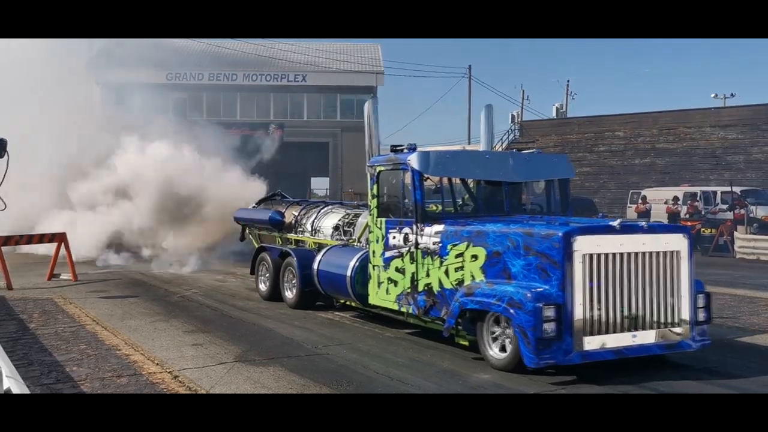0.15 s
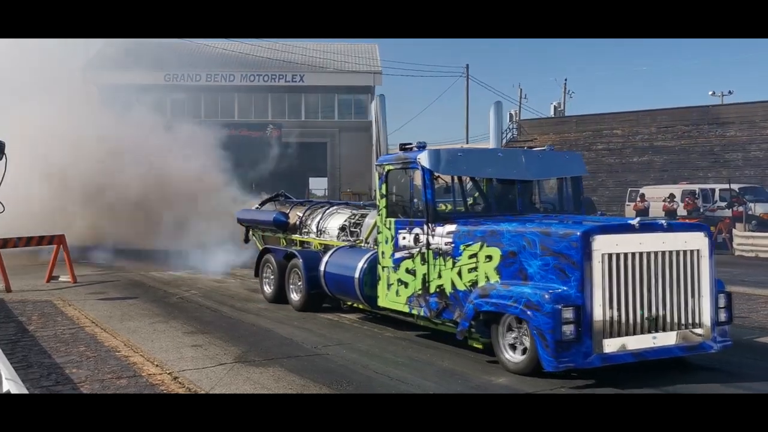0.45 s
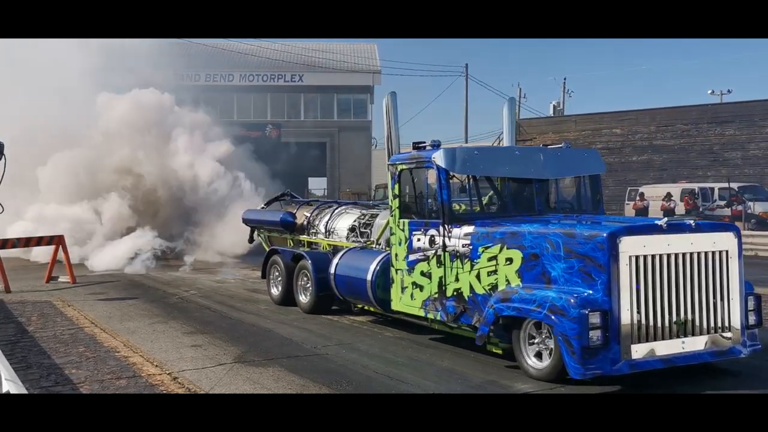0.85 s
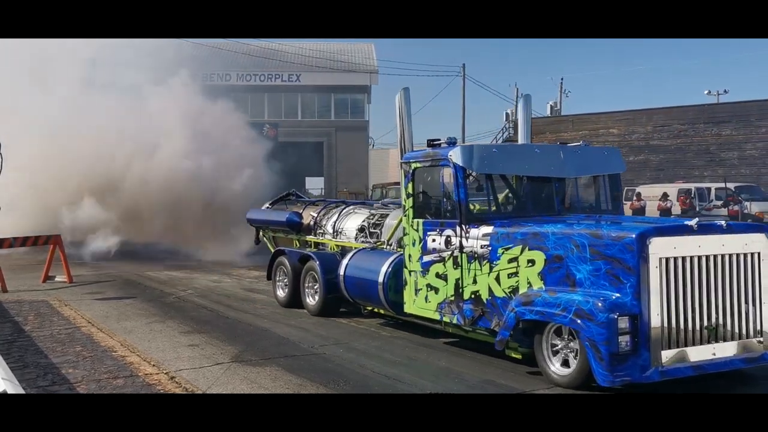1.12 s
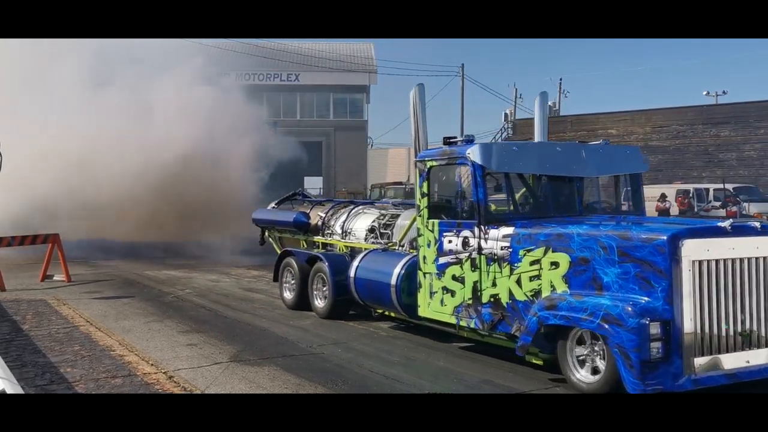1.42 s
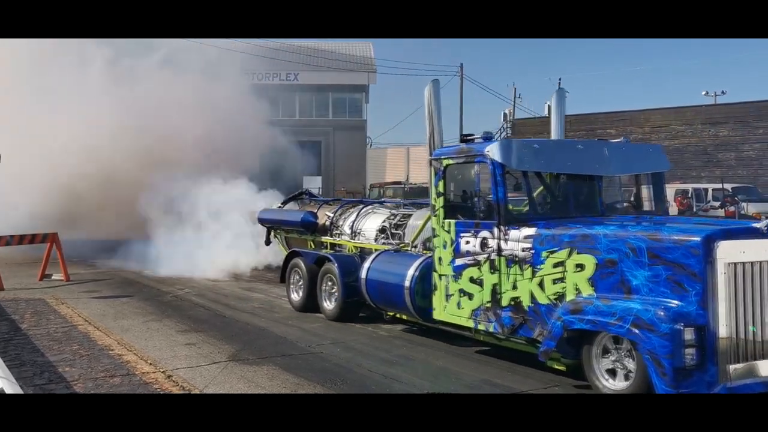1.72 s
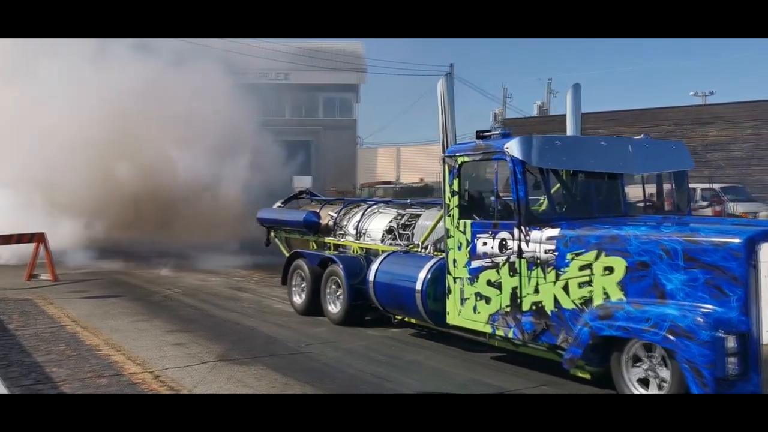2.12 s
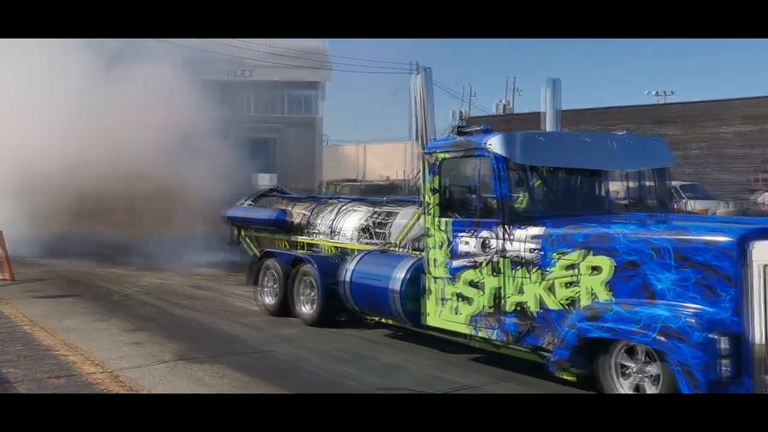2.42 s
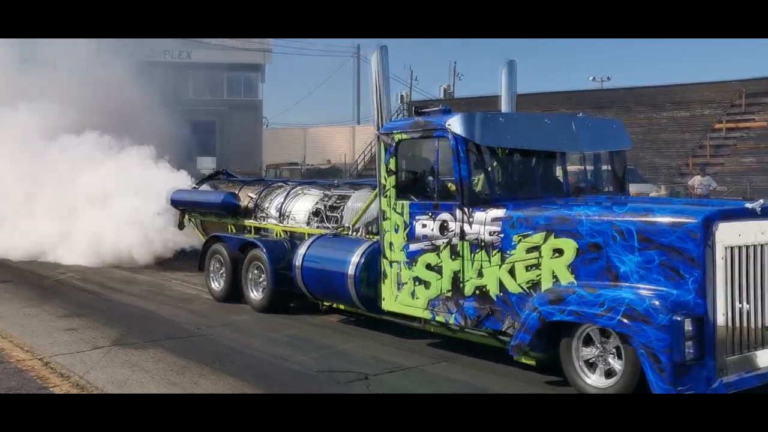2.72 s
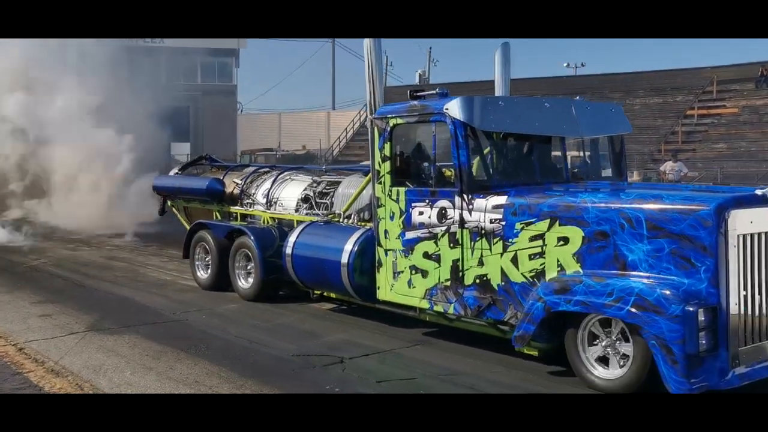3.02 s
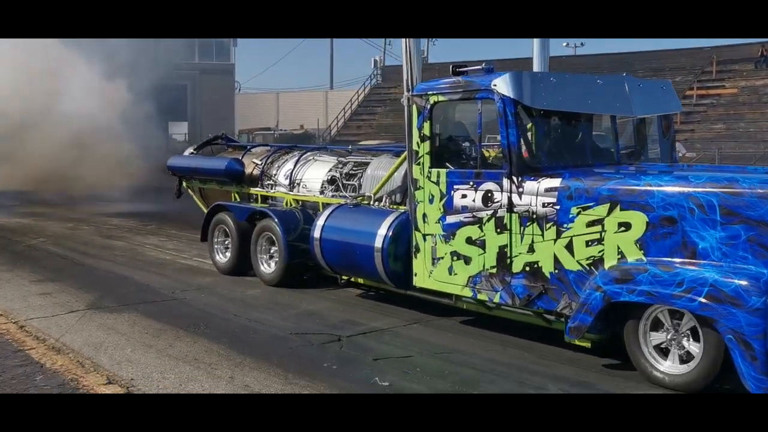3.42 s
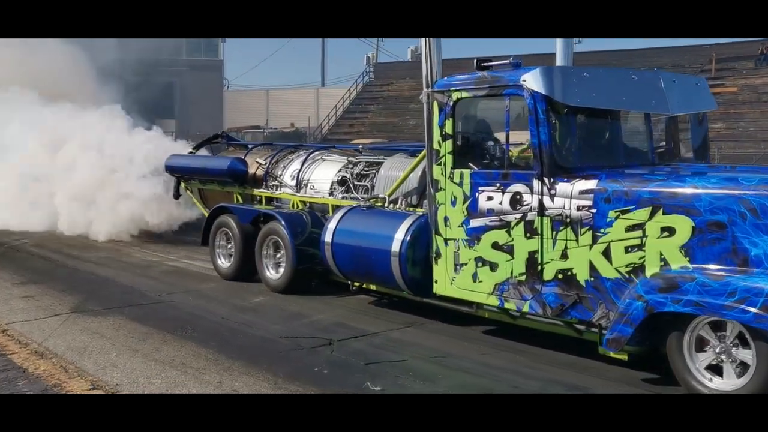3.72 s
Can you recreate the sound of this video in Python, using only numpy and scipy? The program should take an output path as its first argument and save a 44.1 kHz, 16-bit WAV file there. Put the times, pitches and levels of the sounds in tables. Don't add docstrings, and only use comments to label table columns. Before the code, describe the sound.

A jet engine on a truck idles close by with hiss and high wavering whine; four afterburner bangs burst into short rumbling roars, each echoed off a far wall, outdoors, overloading the stereo microphone.

```python
import sys
import numpy as np
from scipy import signal
from scipy.io import wavfile
from scipy.ndimage import uniform_filter1d

SR = 44100
rng = np.random.default_rng(int(sys.argv[2]) if len(sys.argv) > 2 else 0)


def log_audio(samples):
    frames = np.atleast_2d(samples).T
    limited = np.clip(frames, -1, 1)
    pcm = np.round(limited * 32767).astype(np.int16)
    wavfile.write(sys.argv[1], SR, pcm)


def natural_amplitude(level_db):
    exponent = np.asarray(level_db, float) / 20
    return 10 ** exponent


N = 170226

LIGHT_TIMES = [.1005, .831, 1.9435, 2.965]
ECHO_TIMES = [.349, 1.0845, 2.2015, 3.2285]
# (burn length [s], burn level [dB], flare level [dB])
BURNS = [(0.3598, -9, -13), (0.38, -7, -10.5), (0.339, -8.5, -14), (0.419, -9.5, -10.5)]
# (slam level [dB], echo level [dB])
SLAM_LEVELS = [(14, 16), (14, 13), (13, 16), (13, 16)]
# (frequency [Hz], density [dB per Hz])
RUMBLE_SPECTRUM = [(15, -43), (25, -14.5), (108, -3.5), (204, -0.5), (278, -7), (356, -18), (420, -20.5),
                   (550, -44), (920, -120)]
# (frequency [Hz], density [dB per Hz])
FLARE_SPECTRUM = [(250, -1), (400, 6), (650, 5.5), (950, -3.5), (1500, -3.5), (2500, -6), (4500, -13.5),
                  (8000, -20)]
# (frequency [Hz], density [dB per Hz])
ROLL_SPECTRUM = [(30, -4), (60, -7), (110, 0), (170, -4), (260, -15)]
# (time [s], first, second, third harmonic level [dB])
WHINE_LEVELS = [(0, -21.5, -26.5, -34), (.2, -15, -24.5, -41), (.55, -19, -29.5, -29), (.8, -17, -32, -38),
                (1.04, -28, -26, -33.5), (1.14, -14.5, -38.5, -56), (1.33, -20, -25.5, -24.5),
                (1.45, -26, -25.5, -29.5), (1.6, -16.5, -30.5, -38), (2.04, -21, -22, -38),
                (2.139, -8, -28, -48), (2.22, -20, -33, -33), (2.44, -11.5, -23, -34),
                (2.9, -22.5, -19, -37), (3.14, -21.5, -30.5, -45), (3.42, -24.5, -20, -25.5),
                (3.65, -13.5, -26, -32.5), (3.86, -13.5, -26, -44)]
WHINE_PAN_DB = [-10.5, -2, -19.5]
WHINE_LEAD = [0.9, 0.61, 1.84]
# (frequency [Hz], density [dB per Hz])
EXHAUST_SPECTRUM = [(15, -48), (25, -13.5), (157, -7), (642, -13.5), (1500, -11), (2040, -17), (2220, -4.5),
                    (2510, -12), (3500, -24), (4550, -50), (7700, -120)]
# (frequency [Hz], density [dB per Hz])
INTAKE_SPECTRUM = [(1470, -4), (2500, -5.5), (3290, -7.5), (4580, -2.5), (5760, -6.5), (6860, -12.5),
                   (9610, -12), (10900, -8.5), (15600, -20.5)]
# (frequency [Hz], width [Hz], level [dB])
HAYSTACKS = [(652, 195, -30), (1756, 180, -32.5), (2245, 500, -28.5), (2850, 150, -34), (4570, 1260, -30.5),
             (5600, 600, -38), (6750, 1400, -28)]
# (time [s], level [dB])
INTAKE_NEARNESS = [(0, 1), (.7, 0.5), (1.399, 1), (2.102, 1.5), (2.8, 2), (3.3, 3.5), (3.6, 4.5),
                   (3.86, 5.5)]
# (frequency [Hz], density [dB per Hz])
SWIRL_SPECTRUM = [(4000, -20), (4450, -4), (4750, 0), (5100, -10), (6000, -9), (6600, -7), (7200, -25)]
# (frequency [Hz], correlation [-1 to 1])
PORT_LIKENESS = [(60, 0.92), (150, 1), (300, 0.73), (640, 0.9), (1400, 0.22), (3100, 0.12), (6800, 0.013),
                 (15000, .01)]
# (frequency [Hz], left minus right [dB])
PORT_LEAN = [(60, -6), (110, 4.5), (200, -1), (380, -1), (700, -8.5), (1290, -5), (2380, -10), (4400, -2.5),
             (8120, -1), (15000, -15.5)]

HEAVE_LEAD_S = .013


def afterburner():
    slams, burn, flare, roll = np.zeros((4, N))
    events = zip(LIGHT_TIMES, ECHO_TIMES, SLAM_LEVELS, BURNS)
    for light, back, (slam_db, echo_db), (length, burn_db, flare_db) in events:
        lit, returned = since(light), since(back)
        from_heave = np.arange(N) / SR - back + HEAVE_LEAD_S
        slams += slam(light, slam_db, hz=70, rise_s=.007, fall_s=.007)
        slams += slam(back, echo_db, hz=84, rise_s=.004, fall_s=.006)
        slams += natural_amplitude(echo_db - 13) * np.sin(2 * np.pi * 42 * from_heave) * np.exp(-(from_heave / .013) ** 2)

        rise, spent = np.minimum(lit / .009, 1) ** 2, since(light + length)
        ending = np.exp(-spent / 0.026) + natural_amplitude(-15.5) * np.exp(-spent / 0.28)
        clear = 1 - .65 * np.exp(-((from_heave - .006) / .018) ** 2)
        swell = returned / .05
        swell_db = 3 * swell * np.exp(1 - swell)
        burn += rise * ending * clear * natural_amplitude(burn_db + 4.7 * np.exp(-lit / 0.047) + swell_db)

        flare_level = natural_amplitude(flare_db + 5.2 * np.exp(-lit / .03))
        flare += np.minimum(lit / 0.0014, 1) * flare_level * np.exp(-(lit / 0.33) ** 2)
        roll += np.minimum(returned / 0.015, 1) * natural_amplitude(-16.5) * np.exp(-returned / 0.21)
    bright = noise(edged(FLARE_SPECTRUM, 18., 6.1), patchy_db=-1.1, flicker_db=0.7)
    low_roll = noise(edged(ROLL_SPECTRUM, 12., 24.), patchy_db=-3.0, flicker_db=.7)
    port_tilt = natural_amplitude(np.array([[.9], [-.9]]))
    return slams * port_tilt + burn * rumble() + flare * bright + roll * low_roll


def slam(s, db, hz, rise_s, fall_s):
    u = np.arange(N) / SR - s
    push = natural_amplitude(-8) * np.exp(-(u / rise_s) ** 2)
    ring = np.exp(-np.abs(u) / fall_s)
    return -natural_amplitude(db) * np.sin(2 * np.pi * hz * u) * np.where(u < 0, push, ring)


def rumble():
    even_s, even_share = .014, .55
    lumpy = noise(edged(RUMBLE_SPECTRUM, 12., 24.), patchy_db=3.74, flicker_db=2.36)
    power = np.abs(uniform_filter1d((lumpy ** 2).mean(0), size=round(even_s * SR))) + 0.069
    return evened(lumpy / power ** (even_share / 2))


def whine():
    blades, spool_order = 21, 27
    t, table = np.arange(N) / SR, np.transpose(WHINE_LEVELS)
    shaft = shaft_angle(blades)
    blows = LIGHT_TIMES + [back - HEAVE_LEAD_S for back in ECHO_TIMES]
    duck_db = sum(-6 * (since(s) > 0) * np.exp(-since(s) / .04) for s in blows)

    # shaft order, level dB, left over right dB, left lead rad, waver dB
    tones = []
    for k in range(3):
        level_db = np.interp(t, table[0], table[k + 1])
        tones.append(((k + 1) * blades, level_db, WHINE_PAN_DB[k], WHINE_LEAD[k], 1.9))
    tones.append((4 * blades, tones[2][1] - 17, -6, .7, 3.5))
    tones.append((spool_order, -36, -7, .7, 4.5))
    for side in (-1, 1):
        tones.append((blades + side, -47 + 1.55 * nearness(), -7, .7, 4.5))

    out = np.zeros((2, N))
    for order, db, pan_db, lead, waver_db in tones:
        db = db + duck_db + waver_db * wander(40)
        pan = natural_amplitude(pan_db + 1.8 * wander(9.4))
        norm = 2 * np.sqrt(2) / np.abs(1 + pan * np.exp(1j * lead))
        left = pan * np.sin(order * shaft + lead + 0.2 * wander(5.3))
        out += natural_amplitude(db) * norm * np.array([left, np.sin(order * shaft)])
    return out


def shaft_angle(blades):
    blade_hz, sag_hz, sag_fade_s = 2267.5, 45.15, 0.2012
    sag = np.zeros(N)
    for s, (length, _, _) in zip(LIGHT_TIMES, BURNS):
        sag += np.sin(2 * np.pi * since(s) / (1.25 * length)) * np.exp(-since(s) / sag_fade_s)
    return 2 * np.pi * np.cumsum(blade_hz - sag_hz * sag + 2.5 * wander(30.05)) / SR / blades


def hiss():
    near_db = nearness()
    exhaust = noise(edged(EXHAUST_SPECTRUM, 12., 30.), patchy_db=1.34, flicker_db=-0.06)
    intake = noise(edged(INTAKE_SPECTRUM, 26.0, 60.), patchy_db=0.93, flicker_db=0.3)
    scattered = noise(haystacks, patchy_db=1.8, flicker_db=0.84)
    return (natural_amplitude(-21.5 + 0.34 * near_db) * exhaust + natural_amplitude(-21 + 1.03 * near_db) * intake
            + natural_amplitude(-22.5 + 0.98 * near_db) * scattered)


def haystacks(hz):
    power = 0
    for f, width, db in HAYSTACKS:
        power = power + natural_amplitude(db) ** 2 / width / (1 + (2 * (hz - f) / width) ** 2) ** 2
    return 10 * np.log10(power)


def nearness():
    return np.interp(np.arange(N) / SR, *np.transpose(INTAKE_NEARNESS))


def swirl():
    centre_s, spread_s = 3.53, 0.17
    u = (np.arange(N) / SR - centre_s) / spread_s
    return natural_amplitude(-18.5) * np.exp(-u ** 2) * noise(edged(SWIRL_SPECTRUM, 40., 40.2), patchy_db=0.5, flicker_db=0.0)


def noise(shape_db, patchy_db, flicker_db):
    frames, hz = N // 256 + 5, np.fft.rfftfreq(1024, 1 / SR)
    a, b, c, d, patches = rng.standard_normal((frames, 513, 5)).T
    patches = uniform_filter1d(uniform_filter1d(patches, size=10, axis=0), size=10, axis=1)
    flicker = evened(uniform_filter1d(rng.standard_normal(frames), size=5))
    same = read(PORT_LIKENESS, hz)[:, None]
    lean = read(PORT_LEAN, hz)[:, None] / 2
    left = a + 1j * b
    right = same * left + np.sqrt(1 - same ** 2) * (c + 1j * d)
    z = np.array([left * natural_amplitude(lean), right * natural_amplitude(-lean)])
    z *= natural_amplitude(shape_db(hz)[:, None] + patchy_db * evened(patches) + flicker_db * flicker)
    return evened(signal.istft(z, nperseg=1024, noverlap=768)[1][:, :N])


def edged(points, below_db, above_db):
    lo, hi = points[0][0], points[-1][0]
    return lambda hz: (read(points, hz) - below_db * np.log2(np.maximum(lo / (hz + 1), 1))
                       - above_db * np.log2(np.maximum(hz / hi, 1)))


def read(points, hz):
    f, value = np.transpose(points)
    return np.interp(np.log(hz + 1), np.log(f + 1), value)


def wander(rate_hz):
    t = np.arange(0, N + 64, 64) / SR
    f = np.geomspace(rate_hz / 12, rate_hz, 20)
    slow = (np.sin(2 * np.pi * (f * t[:, None] + rng.random(20))) / np.sqrt(f)).sum(1)
    return np.interp(np.arange(N) / SR, t, evened(slow))


def evened(x):
    return x / np.sqrt(np.mean(x ** 2) + 1e-20)


def since(s):
    return np.maximum(np.arange(N) / SR - s, 0)


def scene():
    return afterburner() + whine() + hiss() + swirl()


def low_pass(x):
    return signal.sosfilt(signal.butter(12, 15710, fs=SR, output="sos"), x)


def record(dry):
    port_hz, ceiling, knee = 30, 1.01, 4.0
    dry = signal.sosfilt(signal.butter(1, port_hz, "high", fs=SR, output="sos"), dry)
    bent = dry / (1 + np.abs(dry / ceiling) ** knee) ** (1 / knee)
    return low_pass(bent)


dry = scene()
out = record(dry)
log_audio(out)
```